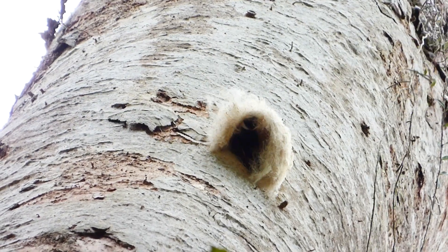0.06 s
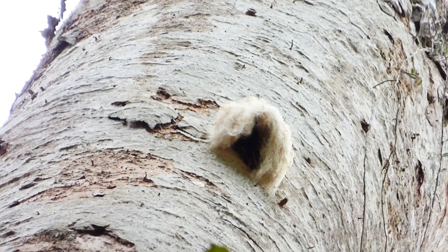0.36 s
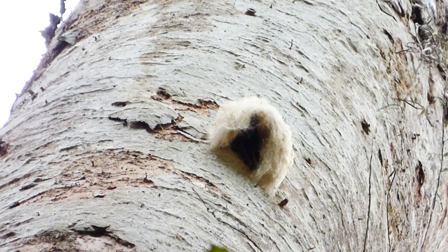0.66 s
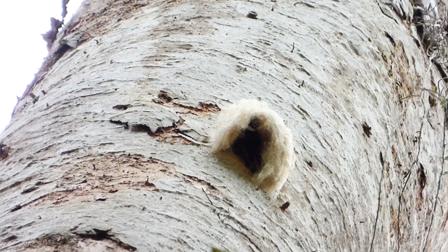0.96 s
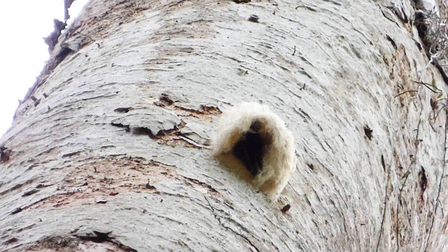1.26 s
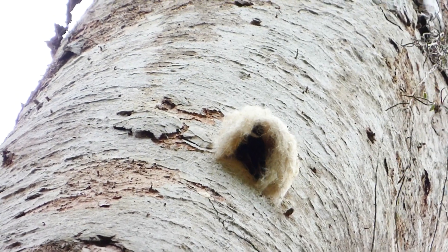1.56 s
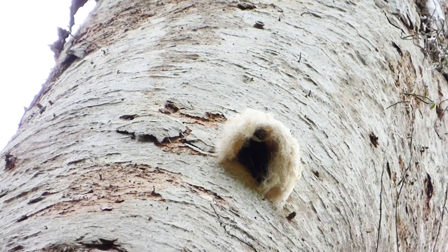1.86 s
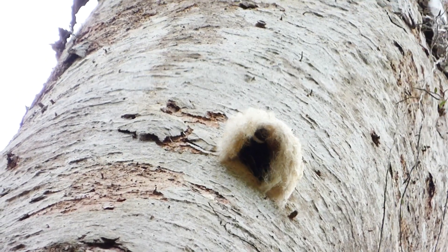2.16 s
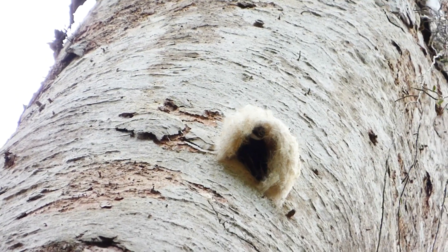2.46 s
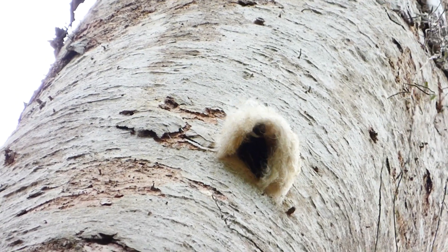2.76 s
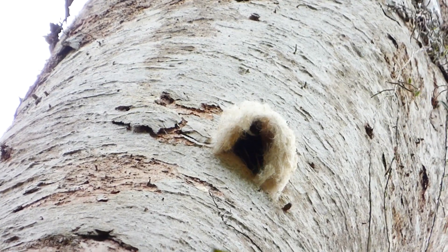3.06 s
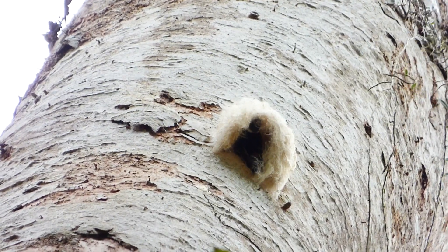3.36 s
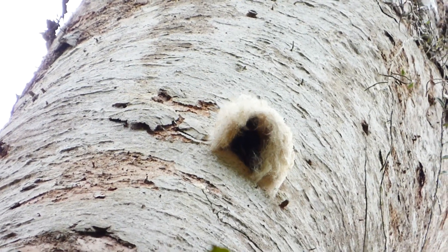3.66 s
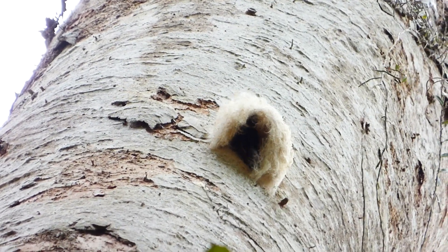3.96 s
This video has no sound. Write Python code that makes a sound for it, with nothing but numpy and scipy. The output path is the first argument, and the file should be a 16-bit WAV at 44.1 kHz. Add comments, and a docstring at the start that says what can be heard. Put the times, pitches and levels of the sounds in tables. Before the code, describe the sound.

A dense chorus of cicadas buzzes steadily in a forest, with one close insect fading and returning. Faint dry ticks come and go; toward the end a distant bird whistles very faintly and the microphone takes one soft knock.

```python
"""A forest filled with cicadas. Each insect buckles a drum that rings near 9 kHz: countless far ones
merge into a sizzle, five closer ones click in fast trains, and the nearest swells and fades.
Under them lie a hollow low hush, a wavering hum and the whistle of a far bird.
A few faint ticks pass, and one soft knock on the camera rings in quickly damped modes."""
import sys
import numpy as np
from scipy import signal
from scipy.fft import rfft, irfft
from scipy.io import wavfile
from scipy.ndimage import uniform_filter1d

SR = 44100
rng = np.random.default_rng(int(sys.argv[2]) if len(sys.argv) > 2 else 0)


def store_wav(level_fs):
    """Save 16-bit WAV to argv[1]."""
    pcm = np.round(np.clip(np.atleast_2d(level_fs), -1, 1) * 32767)
    wavfile.write(sys.argv[1], SR, pcm.T.astype(np.int16))


N = 176400
T = np.arange(N) / SR

# Resonance of a cicada's drum. Each row: frequency in Hz, relative level in dB.
DRUM_SPECTRUM = [(4500, -55), (5900, -36), (6400, -23), (7000, -14), (7650, -6), (8300, -3.5), (9200, -0.5),
                 (10100, -2.5), (11000, -8.5), (12000, -17), (13000, -29.5), (14000, -64)]
RATE_WANDER = 0.0019  # rms fraction of an insect's click rate


def amp(db):
    """Amplitude ratio: tenfold for every 20 dB."""
    return 10 ** (np.asarray(db) / 20)


def unit(x):
    """Normalisation to rms 1."""
    return x / np.sqrt(np.mean(x ** 2) + 1e-20)


def envelope(points):
    """Gain over time, interpolated between (s, dB) points."""
    return amp(np.interp(T, *np.transpose(points)))


def decay(t, t60):
    """Exponential damping: 60 dB in t60 seconds."""
    return np.exp(-np.log(1000) * t / t60)


def add(mix, start_s, sound):
    """Superposition of a sound on the mix."""
    part = mix[..., round(start_s * SR):][..., :sound.shape[-1]]
    part += sound[..., :part.shape[-1]]


def colour(x, spectrum, resonances=()):
    """Filtering by a spectral envelope with bell-shaped peaks and dips; rms 1."""
    hz = np.fft.rfftfreq(x.shape[-1], 1 / SR)
    points_hz, points_db = np.transpose(spectrum)
    gain_db = np.interp(np.log(hz + 1), np.log(points_hz), points_db)
    for centre, width, lift in resonances:
        gain_db += lift / (1 + (2 * (hz - centre) / width) ** 2)
    return unit(irfft(rfft(x) * amp(gain_db), x.shape[-1]))


def drift(top_hz):
    """Random fluctuation: low-pass noise of rms 1."""
    hz = np.fft.rfftfreq(N, 1 / SR)
    low_pass = (hz > 0) * np.exp(-(hz / top_hz) ** 2)
    return unit(irfft(rfft(rng.standard_normal(N)) * low_pass, N))


def patchy_noise(depth_db, length_s, width_hz):
    """Modulated noise: small regions of time and pitch swell and fade independently; rms 1."""
    spectra = signal.stft(rng.standard_normal(N), nperseg=1024, noverlap=768)[2]
    frame_s, bin_hz = 256 / SR, SR / 1024
    patches = uniform_filter1d(rng.standard_normal(spectra.shape), round(length_s / frame_s), axis=1)
    patches = unit(uniform_filter1d(patches, round(width_hz / bin_hz), axis=0))
    return unit(signal.istft(spectra * amp(depth_db * patches), nperseg=1024, noverlap=768)[1][:N])


def ears(mid, side):
    """Sum and difference: left and right from their common and differing parts."""
    return np.array([mid + side, mid - side])


def hush():
    """Background air: broadband noise, made hollow by a few resonances."""
    # Spectra. Each row: frequency in Hz, relative level in dB.
    mid_spectrum = [(25, 5.5), (50, -5), (100, 0.5), (170, 3.5), (290, 5), (415, 3), (480, 1), (700, 3),
                    (1100, -1.5), (1900, -4.5), (3550, -8), (3890, -9), (3990, 0), (4170, -4.5), (4350, -8),
                    (4800, -2), (5800, -4.5), (14000, -13)]
    side_spectrum = [(20, 5), (100, -6), (300, 1.5), (400, 4.5), (650, 8), (1400, 3), (2000, -2),
                     (3600, -10.5), (5200, -3.5), (14000, -3)]
    # Resonances and dips. Each row: centre in Hz, width in Hz, lift in dB.
    mid_hollows = [(248, 9.3, 2), (374, 34, -8.5), (676, 24, 2.5), (1390, 130, 2)]
    side_hollows = [(388, 50, -3), (535, 120, 9), (690, 80, -6), (826, 110, 6.5), (940, 93, 8.5)]
    # Slight swell. Each row: time in seconds, gain in dB.
    swell = [(0, 3), (1.5, 3), (2.8, 3.5), (3.4, 3.5), (4, 3.5)]
    patches = dict(depth_db=2.5, length_s=0.058, width_hz=130)
    mid = amp(-51.5) * colour(patchy_noise(**patches), mid_spectrum, mid_hollows)
    side = amp(-52.5) * colour(patchy_noise(**patches), side_spectrum, side_hollows)
    return ears(mid, side) * envelope(swell)


def hum(waver_hz=6.04):
    """Narrow noise bands sound as tones; frequency and amplitude modulation make them waver and throb."""
    # Tones. Each row: frequency in Hz, blur in Hz, level before the swell in dB, throb in dB.
    tones = [(340.7, 18.6, -58.5, 4.5), (596, 24, -64, 1.5), (772.4, 31, -64, -1), (986, 30, -66, -1.5)]
    # Swell of the hum. Each row: time in seconds, gain in dB.
    swell = [(0, -11), (.25, 1), (.55, 3), (1.4, -1.5), (1.8, 1), (2.15, -1.5), (3.0, 3), (3.6, -0.5),
             (3.8, 4), (4, -7)]
    out = np.zeros(N)
    for hz, blur_hz, db, throb_db in tones:
        cycles = np.cumsum(hz + waver_hz * drift(top_hz=9.26)) / SR
        beating = drift(blur_hz) + 1j * drift(blur_hz)
        throb = amp(throb_db * np.clip(drift(top_hz=10.4), -2, 1))
        out += amp(db) * unit((beating * np.exp(2j * np.pi * cycles)).real * throb)
    return out * envelope(swell)


def bird(settle_s=0.068, waver=0.0043, fading_db=4.5):
    """Far whistles: pure tones relax exponentially onto their pitch and fade in and out on their way."""
    # Each row: start and length in seconds, first and settled pitch in Hz, level before fading in dB.
    whistles = [(3.2, .24, 2600, 2415, -65), (3.41, .31, 2410, 2338, -63), (3.75, .25, 2180, 2185, -63),
                (3.94, .15, 2410, 2405, -60)]
    out = np.zeros(N)
    for start, length, first_hz, settled_hz, db in whistles:
        t = T[:int(length * SR)]
        hz = settled_hz + (first_hz - settled_hz) * np.exp(-t / settle_s)
        hz *= 1 + waver * drift(top_hz=40)[:len(t)]
        tone = np.sin(2 * np.pi * np.cumsum(hz) / SR)
        add(out, start, amp(db) * signal.windows.tukey(len(t), .3) * tone)
    return out * amp(fading_db * drift(top_hz=25))


def burst(spectrum, db, t60, side_db=-7):
    """A transient of coloured noise with exponential decay."""
    t = T[:8192]
    mid, side = colour(rng.standard_normal((2, len(t))), spectrum)
    return ears(mid, amp(side_db) * side) * amp(db) * decay(t, t60)


def ticks(scuff_rise_s=.008):
    """Brief noise transients sound as dry ticks; a slower, duller one trails the last as a scuff."""
    # Ticks. Each row: start in seconds, level in dB, 60 dB decay time and rise time in seconds.
    events = [(.894, -42, .025, .001), (.963, -38.5, .035, .0005), (2.691, -39, .06, .005)]
    # Spectra. Each row: frequency in Hz, relative level in dB.
    tick_spectrum = [(500, -43), (2000, 18), (3500, 21.5), (6000, 23.5), (10000, -14), (14000, -14)]
    scuff_spectrum = [(500, -24), (1500, -6), (2600, 1), (4000, -11), (8000, -25)]
    out, t = np.zeros((2, N)), T[:8192]
    for start, db, t60, rise in events:
        add(out, start, np.minimum(t / rise, 1) * burst(tick_spectrum, db, t60))
    add(out, 2.705, np.minimum(t / scuff_rise_s, 1) * burst(scuff_spectrum, db=-49, t60=0.2))
    return out


def knock(rise_s=0.0011):
    """An impact excites damped modes, with a short noisy tail and a soft bump after it."""
    # Modes. Each row: frequency in Hz, level in dB, 60 dB decay time in seconds.
    modes = [(332, -42, 0.057), (1110, -29, 0.012), (1326, -25.5, 0.012), (1440, -51, 0.093),
             (1810, -45, 0.0073)]
    # Spectra. Each row: frequency in Hz, relative level in dB.
    tail_spectrum = [(200, -29), (800, -16), (1400, -7), (2100, -12), (5000, -19)]
    bump_spectrum = [(100, -10), (350, 11), (650, 10), (1300, -16), (5000, -18)]
    out, t = np.zeros((2, N)), T[:8192]
    ring = sum(amp(db) * decay(t, t60) * np.sin(2 * np.pi * hz * t) for hz, db, t60 in modes)
    tail = burst(tail_spectrum, db=-43.5, t60=0.31)
    add(out, 3.7503, np.minimum(t / rise_s, 1) * (ring + tail))
    add(out, 3.796, burst(bump_spectrum, db=-47, t60=.13))
    return out


def far_chorus(side_db=-9, flutter_db=0.36):
    """Countless drums add incoherently into noise, in which single pitches glint faintly."""
    # Swell of the chorus. Each row: time in seconds, level in dB.
    swell = [(0, -30), (.6, -29.5), (1.2, -29), (1.6, -29), (2.0, -28.5), (2.5, -28.5), (3.2, -29.5),
             (4, -30)]
    # Sound from all round differs between the ears, most in the top octave.
    # Each row: centre in Hz, width in Hz, lift in dB.
    diffuse_band = [(11800, 1200, 6)]
    mid = colour(patchy_noise(depth_db=3, length_s=0.18, width_hz=50), DRUM_SPECTRUM)
    side = colour(rng.standard_normal(N), DRUM_SPECTRUM, diffuse_band)
    flutter = amp(flutter_db * drift(top_hz=25.1))
    return ears(mid, amp(side_db) * side) * envelope(swell) * flutter


def clicks(cycles, spread_db=2.7):
    """Buckling: one impulse of uneven strength whenever the cycle count passes a whole number."""
    impulses = np.diff(np.floor(cycles), prepend=np.floor(cycles[0]))
    return impulses * amp(spread_db * rng.standard_normal(N))


def cicada(train, scatter_db, scatter_s=0.0075):
    """Impulses ring the resonant drum; the sound arrives directly and scattered by leaves and trunks."""
    t = T[:2048]
    paths = rng.standard_normal((2, len(t))) * np.exp(-t / scatter_s)
    paths *= amp(scatter_db) / np.linalg.norm(paths[0])
    paths[:, 0] = 1  # direct path
    arrivals = signal.oaconvolve(train[None], paths, axes=1)[:, :N]
    return colour(arrivals, DRUM_SPECTRUM)


def neighbours(swell_db=2.6):
    """Nearly periodic click trains from closer insects, with equal direct and scattered energy."""
    # Insects. Each row: clicks per second, mean level in dB.
    insects = [(88.2, -44), (131.7, -42.5), (121.5, -45), (176, -46), (214.5, -45)]
    out = np.zeros((2, N))
    for rate, db in insects:
        cycles = rng.random() + np.cumsum(rate * (1 + RATE_WANDER * drift(top_hz=2.1))) / SR
        out += amp(db + swell_db * drift(top_hz=5.9)) * cicada(clicks(cycles), scatter_db=0)
    return out


def nearest_cicada(muscle_hz=43.98, lag_cycles=.657):
    """The drum buckles twice in each muscle cycle; at close range the direct sound dominates."""
    # Swell of its song. Each row: time in seconds, level in dB.
    swell = [(0, -35.5), (.25, -37), (.5, -40), (.92, -39.5), (1.03, -35.5), (1.38, -34.5), (1.52, -39),
             (1.75, -36.5), (2.15, -44), (2.4, -53), (2.9, -50), (3.15, -36), (3.55, -38.5), (4, -39)]
    cycles = np.cumsum(muscle_hz * (1 + RATE_WANDER * drift(top_hz=3.5))) / SR
    train = clicks(cycles) + clicks(cycles - lag_cycles)
    return envelope(swell) * cicada(train, scatter_db=-18)


def scene(lean_db=0.47):
    """Superposition of all sources, with the cicadas slightly louder on the right."""
    cicadas = far_chorus() + neighbours() + nearest_cicada()
    return cicadas * amp([[-lean_db], [lean_db]]) + hush() + hum() + ticks() + knock() + bird()


def record(dry, cutoff_hz=13700):
    """Band limiting: a steep low-pass filter removes the highest treble."""
    low_pass = signal.firwin(301, cutoff_hz, window=("kaiser", 9), fs=SR)
    return signal.oaconvolve(dry, low_pass[None], "same")


dry = scene()
out = record(dry)
store_wav(out)
```